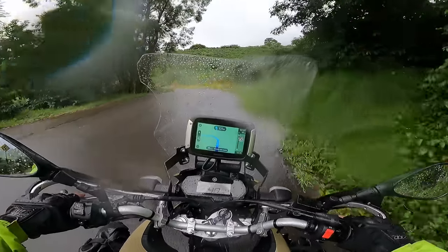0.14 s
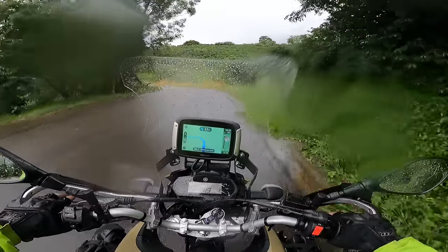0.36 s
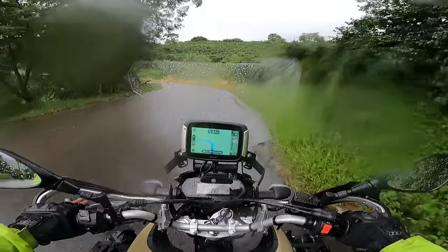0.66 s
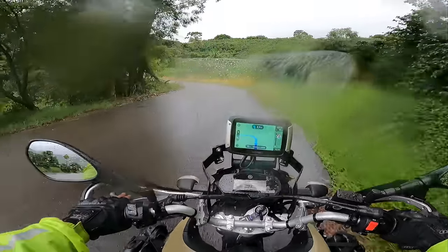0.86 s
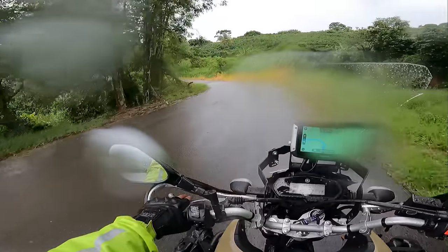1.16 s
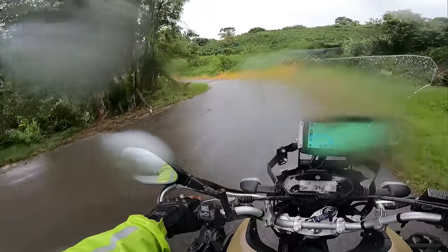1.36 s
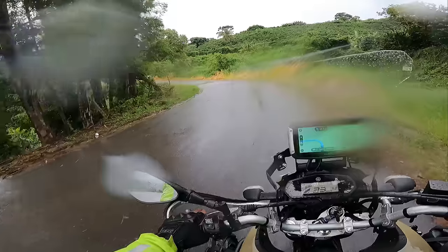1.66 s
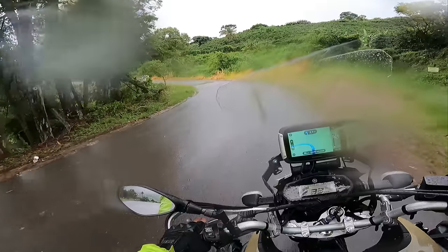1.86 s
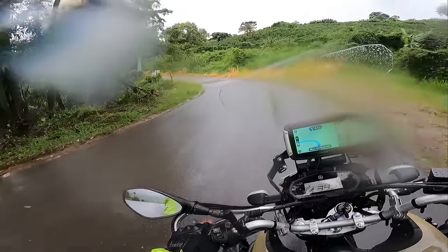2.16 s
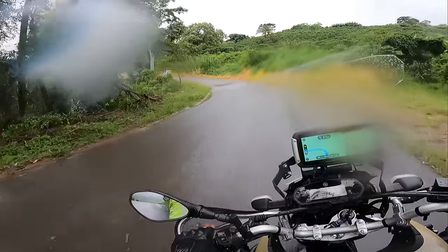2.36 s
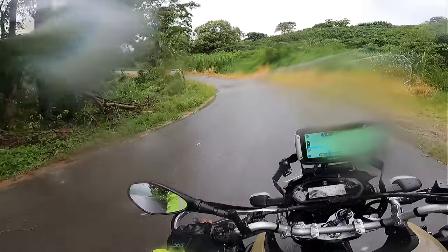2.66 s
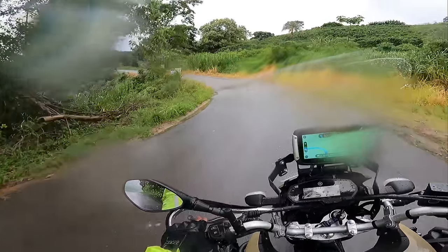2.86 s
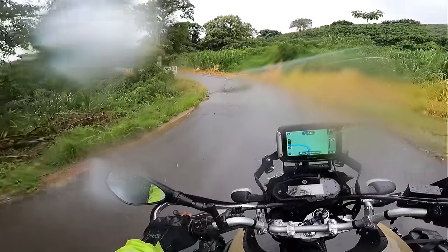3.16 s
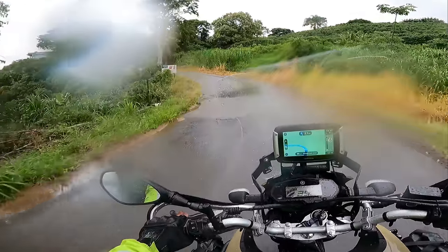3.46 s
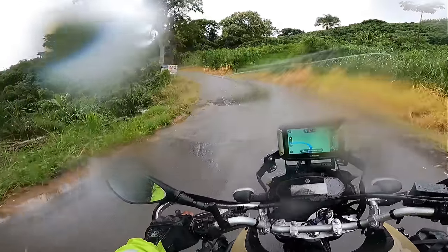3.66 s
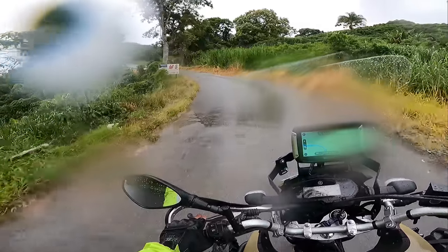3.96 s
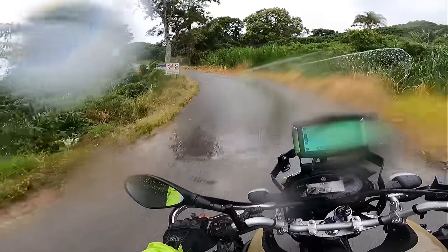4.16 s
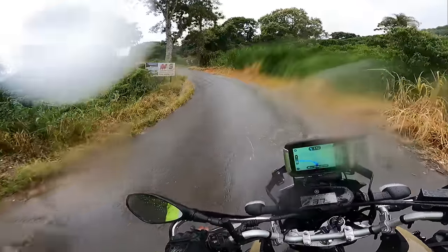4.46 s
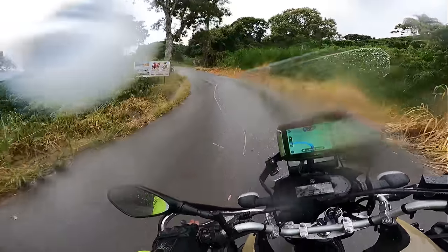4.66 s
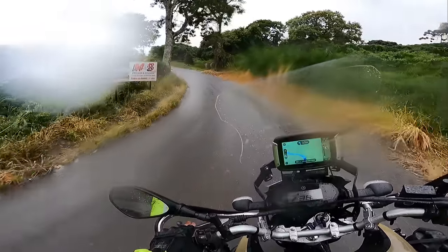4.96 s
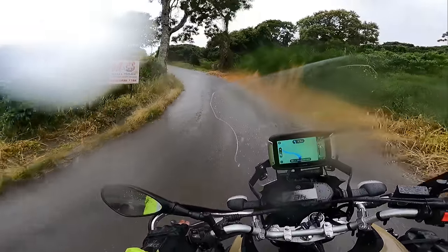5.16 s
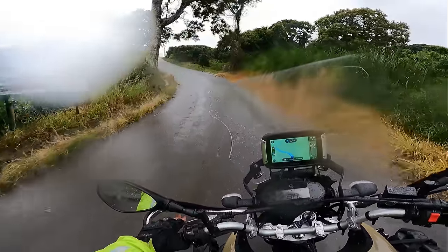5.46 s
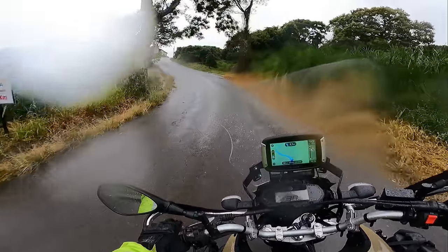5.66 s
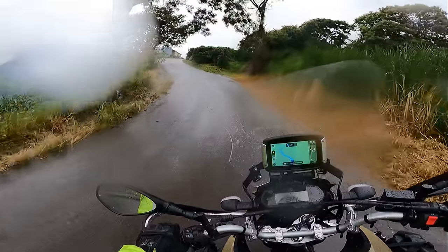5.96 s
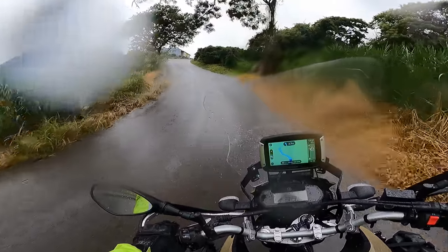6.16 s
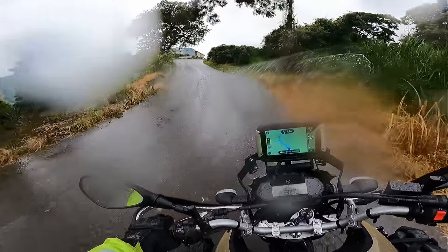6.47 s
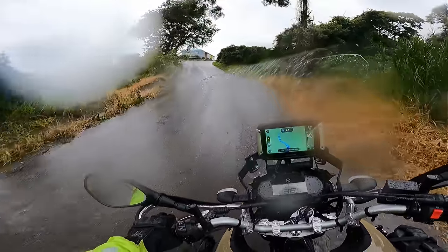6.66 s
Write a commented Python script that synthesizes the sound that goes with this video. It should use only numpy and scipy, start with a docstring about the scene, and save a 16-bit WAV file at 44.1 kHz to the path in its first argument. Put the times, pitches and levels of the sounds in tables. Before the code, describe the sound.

A single-cylinder motorcycle cruises on a wet country road, heard close from the rider's position. Its rapid exhaust pulses blur into a throaty drone, easing slightly, then slowly climbing. Deep wind thumps and buffets the microphone throughout, over fine tyre spray hiss and light metallic engine clatter. Sharp water drops tick on the housing mid-ride, and near six seconds the throttle opens, quicker and louder.

```python
"""Exhaust beats come first, close under the rider's helmet: a single-cylinder motorcycle on a wet road.
Clicks at the firing rate ring the pipe, tail and chamber; taps, knock and noise ring the metal parts.
Tones on the firing rate make drones and gear whine. Shaped noise makes the airstream, which thumps the
microphone, the tyre spray, the drops ticking on its housing and the brief whirrs.
In the last second the throttle opens: the firings quicken and the exhaust grows louder."""
import sys
import numpy as np
from scipy import signal
from scipy.fft import rfft, irfft
from scipy.io import wavfile
from scipy.ndimage import uniform_filter1d

SR = 44100
rng = np.random.default_rng(int(sys.argv[2]) if len(sys.argv) > 2 else 0)


def store_wav(level_fs):
    """Save 16-bit WAV to argv[1]."""
    pcm = np.round(np.clip(np.atleast_2d(level_fs), -1, 1) * 32767)
    wavfile.write(sys.argv[1], SR, pcm.T.astype(np.int16))


def convert_level_to_amplitude(level_db):
    """Map a level in decibels to its linear amplitude factor."""
    exponent = np.asarray(level_db, float) / 20
    return 10 ** exponent


N = 300446
T = np.arange(N) / SR  # seconds

# Crank speed along the road. Each row: time in seconds, firings per second.
CRANK_SPEED = [(0.0, 31.24), (0.3, 29.29), (0.87, 27.13), (1.55, 25.85), (2.4, 27.06), (3.34, 27.83),
               (4.19, 29.17), (4.48, 28.79), (4.65, 30.12), (4.85, 29.57), (5.3, 29.76), (5.92, 29.5),
               (6.06, 37.01), (6.2, 34.77), (6.35, 38.9), (6.43, 39.3), (6.5, 37.22), (6.81, 36.35)]


def evened(x):
    """Scales to unit power."""
    return x / np.sqrt(np.mean(x ** 2) + 1e-20)


def curves(rows):
    """Every column of a table after its times, drawn as straight lines over all samples."""
    s, *columns = np.transpose(rows)
    return [np.interp(T, s, c) for c in columns]


def wander(smooth_s):
    """Slow random drift of unit power: noise averaged twice over smooth_s seconds."""
    size = int(smooth_s * SR)
    once = uniform_filter1d(rng.standard_normal(N), size)
    return evened(uniform_filter1d(once, size))


def coloured(points):
    """Noise of unit power with the given spectrum, drawn straight over log frequency."""
    f, db = np.transpose(points)
    hz = np.fft.rfftfreq(N, 1 / SR)
    gain = convert_level_to_amplitude(np.interp(np.log(hz + 0.2), np.log(f), db))
    return evened(irfft(rfft(rng.standard_normal(N)) * gain, N))


def ring(x, modes):
    """Passes x through a set of resonances of alternating sign, then scales to unit power."""
    out = np.zeros(N)
    for k, (hz, width, db) in enumerate(modes):
        pole = np.exp((2j * np.pi * hz - np.pi * width) / SR)
        rung = signal.lfilter([1 - abs(pole)], [1, -pole], x).imag
        out += (-1) ** k * convert_level_to_amplitude(db) * rung
    return evened(out)


def beats(turns, spread_db):
    """One click at each whole turn, of varying strength."""
    size = convert_level_to_amplitude(spread_db * rng.standard_normal(2000))
    whole = np.floor(turns).astype(int)
    return np.diff(whole, prepend=whole[0]) * size[whole % 2000]


def bump(s, half_s):
    """A smooth rise and fall about s, down to 1/e at half_s either side."""
    return np.exp(-np.minimum(((T - s) / half_s) ** 2, 50))


def crank():
    """Cycles completed, a little uneven: combustion never starts at quite the same angle."""
    turns = 1 + np.cumsum(curves(CRANK_SPEED)[0]) / SR
    return turns + .006 * wander(.03)


def stand_out(column):
    """Gain on firings harder or softer than their neighbours; the blast comes just before it is heard in full."""
    # Each row: time in seconds, bark gain in dB, knock gain in dB.
    uneven_firings = [(.037, 5, 0), (.234, 4, 0), (.373, 4, 0), (.477, 7, 0), (.705, 5, 0), (2.12, 5, 0),
                      (2.159, 6, 0), (2.492, 2, 0), (2.602, 6, 0), (2.639, 2, 0), (2.748, 6, 0),
                      (2.858, 4, 0), (3.112, 6, 0), (3.147, 4, 0), (3.684, 8, 0), (3.824, 3, 0),
                      (3.86, 4, 0), (4.174, 5, 0), (4.309, 4, 0), (4.415, 4, 0), (4.549, 4, 0),
                      (4.684, 6, 0), (4.751, 5, 0), (4.784, 5, 0), (4.852, 4, 0), (4.954, 6, 0),
                      (5.021, 4, 0), (5.357, 6, 0), (5.561, 6, 0), (5.762, 5, 0), (6.081, 4, -4),
                      (6.108, -5, -6), (6.135, 5, -6), (6.162, -3, -5), (6.192, 6, -5), (6.22, -5, 7),
                      (6.25, -2, -5), (6.276, 0, 4), (6.304, 4, -7), (6.331, 6, 5), (6.381, -4, -7),
                      (6.431, -5, -4), (6.456, 5, 2), (6.538, 3, 1), (6.592, 0, 2), (6.619, 0, 3),
                      (6.645, 2, 2), (6.672, -3, 0), (6.701, 4, 5), (6.727, 2, 4), (6.755, 0, 2),
                      (6.783, -2, -3)]
    return convert_level_to_amplitude(sum(row[column] * bump(row[0] - .004, .011) for row in uneven_firings))


def silencer(turns):
    """A crisp firing of varying strength; the chambers even it out into a dull, steady string of echoes."""
    # Reflections between the chambers. Each row: delay in ms, gain before the low-pass.
    reflections = [(4.3, -0.095), (9.1, 0.61), (12.7, 0.54), (17.9, -0.35), (22.2, 0.26), (26.5, -0.57),
                   (31, -0.07)]
    crisp = evened(stand_out(column=1) * beats(turns, spread_db=1.3))
    steady = evened(beats(turns, spread_db=1))
    echoes = sum(gain * np.roll(steady, int(ms * SR / 1000)) for ms, gain in reflections)
    dull = signal.lfilter(*signal.butter(4, 600, fs=SR), echoes)
    return crisp, .5 * steady + .9 * dull


def exhaust(turns, firing, echoed, over_cruise_db):
    """Firing pulses and gas rush ring the pipe; the tail barks and the first chamber thumps."""
    # Exhaust pipe and silencer. Each row: centre in Hz, width in Hz, relative gain in dB.
    pipe_modes = [(188, 49, -3), (269, 33, -3), (350, 32, -4), (489, 86, -0.5), (523, 90, 0.5),
                  (708, 132, 1.5), (825, 82, 1.5), (813.3, 21, 7.5), (871, 30, 1)]
    # Short tail pipe that barks at each firing. Each row: centre in Hz, width in Hz, relative gain in dB.
    tail_modes = [(830, 185, 0)]
    # First chamber, thumped just after each firing. Each row: centre in Hz, width in Hz, relative gain in dB.
    chamber_modes = [(480, 105, 0)]
    # Balance against the pipe. Each row: time in seconds, bark gain in dB, thump gain in dB, ahead of the mix.
    punch_rows = [(0, -3.5, -4), (.7, 1.5, -3.5), (.95, -1, -2.5), (1.4, -1.5, -3), (2, -0.5, -1),
                  (2.15, 0.5, 1), (3.1, -1.5, -0.5), (3.8, -1.5, -2), (4, -2.5, -3.5), (4.7, 0, -1),
                  (5.7, 0, -0.5), (6.1, -0.5, -4.5), (6.81, 0.5, -6.5)]
    bark_gain, thump_gain = convert_level_to_amplitude(np.array(curves(punch_rows)))
    rush = (.5 + np.exp(-(turns % 1) / 0.8)) * rng.standard_normal(N)
    pipe = ring(.8 * echoed + .5 * evened(rush), pipe_modes)
    # the bark gains half a dB over the rest of the exhaust per dB of load
    blast = np.roll(firing * convert_level_to_amplitude(.5 * over_cruise_db), 60)
    bark = ring(ring(blast, tail_modes), tail_modes)  # rung twice, it starts softly
    late_beats = np.roll(beats(turns, spread_db=1.5), 270)  # 6 ms after the firing
    thump = ring(ring(late_beats, chamber_modes), [(480, 220, 0)])
    return .72 * pipe + .62 * bark_gain * bark + .58 * thump_gain * thump


def valve_cover(turns, valve_db, knock_db):
    """Valve taps, steady valve-gear noise and combustion knock ring the cover."""
    # Valve cover. Each row: centre in Hz, width in Hz, relative gain in dB.
    cover_modes = [(3415, 370, 19), (3610, 495, 21)]
    # What the knock rings after the cover. Each row: centre in Hz, width in Hz, relative gain in dB.
    knock_modes = [(3660, 440, 0), (2100, 500, -12)]
    # Valves seating. Each row: share of the cycle after firing, relative level in dB.
    seatings = [(.49, 0), (.7, -5), (.93, 0)]
    taps = evened(sum(convert_level_to_amplitude(db) * beats(turns - share, spread_db=3) for share, db in seatings))
    gear = convert_level_to_amplitude(valve_db) * (.45 * taps + rng.standard_normal(N))
    knock = convert_level_to_amplitude(knock_db) * evened(stand_out(column=2) * beats(turns - .04, spread_db=.8))
    gear_ring = ring(ring(gear, cover_modes), [(3350, 2800, 0)])
    knock_ring = ring(ring(knock, cover_modes + knock_modes[1:] * 2), knock_modes)
    # ringing gives unit power, so each takes back the level that drove it
    return gear_ring * np.sqrt(np.mean(gear ** 2)) + knock_ring * np.sqrt(np.mean(knock ** 2))


def clatter(turns, firing):
    """Noise that surges with every cycle, and the firing itself, ring the engine cases."""
    # Engine cases and frame. Each row: centre in Hz, width in Hz, relative gain in dB.
    case_modes = [(880, 1200, 3.5), (1332, 83, 9), (1752, 110, -5), (2124, 63, 4.5), (2640, 450, -12.5),
                  (4230, 20, -6.5), (6840, 33, -5), (9230, 110, -14)]
    shake = (.9 + np.exp(-((turns + .02) % 1) / .2)) * convert_level_to_amplitude(1.5 * wander(.01))
    return ring(evened(shake * rng.standard_normal(N)) + .2 * firing, case_modes)


def drones(turns):
    """Pure tones on multiples of the firing rate, at a resting level save where the frame sings along or fades."""
    # Held tones. Each row: multiple of the firing rate, start in seconds, end in seconds, mean level in dB.
    held_tones = [(3, .12, .63, -31), (11, .75, 3.3, -44), (12, 1, 3.9, -43.5), (5, .9, 1.65, -40),
                  (10, 1.8, 3.4, -38.5), (10, 3.4, 4.6, -36.5), (10, 4.7, 5.75, -39.5), (5, 2.7, 4.3, -41),
                  (2, 5.95, 6.9, -35), (4, 6.02, 6.9, -33), (4, 6.28, 6.47, -36), (5, 5.85, 6.9, -56),
                  (8, 6.05, 6.9, -38), (13, 6.5, 6.9, -38), (12, 6.25, 6.9, -42), (22, 6.3, 6.9, -35.5)]
    # Tones outside those holds. Each row: multiple of the firing rate, mean level in dB.
    resting_tones = [(2, -50), (3, -47), (4, -47), (5, -44), (8, -56), (10, -45), (11, -56), (12, -56),
                     (13, -56), (22, -56)]
    fade_s = .1
    out = np.zeros(N)
    for k, rest_db in resting_tones:
        level = convert_level_to_amplitude(rest_db)
        for multiple, start, end, db in held_tones:
            if multiple == k:
                hold = np.clip(np.minimum(T - start, end - T) / fade_s + .5, 0, 1)
                level = level + (convert_level_to_amplitude(db) - convert_level_to_amplitude(rest_db)) * hold
        tone = np.sqrt(2) * np.sin(2 * np.pi * (k * turns + rng.random()))
        out += level * convert_level_to_amplitude(1.7 * wander(.05)) * tone
    return out


def engine(turns):
    """Load and revs set the levels of exhaust, valve cover and clattering cases; drones join them."""
    # Engine load, as level of the exhaust. Each row: time in seconds, level in dB.
    load_rows = [(0, -31), (.8, -32.5), (1.05, -33), (1.9, -32), (2.3, -30.5), (3.2, -29.5), (3.5, -30),
                 (3.8, -30), (4.5, -31), (4.8, -30), (5.2, -33.5), (5.45, -31.5), (5.85, -33), (6.1, -28),
                 (6.25, -29.5), (6.47, -26), (6.6, -28), (6.81, -26.5)]
    exhaust_db = curves(load_rows)[0]
    over_cruise_db = exhaust_db + 31.5  # above the load at which the base levels hold
    revs_hz = curves(CRANK_SPEED)[0] - 28.5  # above the cruising firing rate
    metal_db = over_cruise_db + 0.26 * revs_hz  # load and faster revs make the metal parts louder
    knock_db = -66 + 2.5 * over_cruise_db + 1.4 * revs_hz  # grows steeply with load and revs
    firing, echoed = silencer(turns)
    out = convert_level_to_amplitude(exhaust_db) * exhaust(turns, firing, echoed, over_cruise_db)
    out += valve_cover(turns, -52.5 + metal_db, knock_db)
    out += convert_level_to_amplitude(-40 + metal_db) * clatter(turns, firing)
    return out + drones(turns)


def whine(turns):
    """A fuzzy gear tone that rides on the crank speed: teeth mesh 49 times a cycle."""
    # Gear whine. Each row: time in seconds, level in dB.
    whine_rows = [(0, -51), (.7, -76), (.85, -48), (1.7, -46.5), (2.3, -53), (3.3, -46), (4.6, -50),
                  (5.1, -53), (6.81, -50)]
    order, width_hz = 49, 70
    pole = np.exp(-np.pi * width_hz / SR)
    fuzz = signal.lfilter([1], [1, -pole], rng.standard_normal(N) + 1j * rng.standard_normal(N))
    tone = (fuzz * np.exp(2j * np.pi * order * turns)).real
    return convert_level_to_amplitude(curves(whine_rows)[0]) * evened(tone)


def wind():
    """Deep rumble, lumpy buffeting, and single dips or pushes of pressure with a rebound either side."""
    # Airstream at the microphone, before it flattens.
    # Each row: time in seconds, rumble level in dB, buffeting level in dB.
    air_rows = [(0, -13.5, -21), (.5, -18, -24), (1.2, -17.5, -23), (1.75, -20, -21.5), (2.05, -17, -22.5),
                (2.5, -14.5, -18), (3.1, -12, -28), (3.7, -15.5, -21), (4.25, -27, -23), (4.5, -6.5, -17.5),
                (4.78, -22.5, -24.5), (5.25, -18.5, -25.5), (5.85, -24, -24.5), (6.2, -13, -20.5),
                (6.6, -27, -28), (6.81, -15, -19)]
    # Gusts on top of it. Each row: time in seconds, rumble in dB, buffeting in dB, half length in seconds.
    gust_rows = [(0.092, -30, -24, 0.029), (0.566, -30, -24, 0.013), (0.663, -7, -37, 0.026),
                 (0.788, -48, -15.5, 0.017), (0.968, -14, -26, 0.048), (1.413, -8.5, -33, 0.0082),
                 (1.595, -8.5, -38, 0.025), (1.72, -27, -18.5, 0.046), (1.82, -32, -20, 0.035),
                 (1.919, -17, -15.5, 0.016), (2.162, -15, -46, 0.1), (2.34, -10.5, -20.5, 0.098),
                 (2.73, -5.5, -48, 0.026), (2.8, -32, -51, .02), (2.91, -32, -17.5, 0.034),
                 (3.05, -14, -22, 0.056), (3.356, -10, -14, 0.027), (3.866, -26, -34, 0.016),
                 (4.02, -6.5, -41, 0.052), (4.484, -13, -31, 0.036), (4.93, -0.5, -21.5, 0.067),
                 (5.11, -25, -27, 0.033), (5.513, -12.5, -42, 0.096), (5.736, -34, -18, 0.043),
                 (5.992, -8, -20, 0.018), (6.122, -11, -26, 0.015), (6.413, -13, -32, 0.056)]
    # Colour of the rumble. Each row: frequency in Hz, relative level in dB per Hz.
    rumble_colour = [(3, -42), (7, 5), (11, 8.5), (22, -8.5), (30, -11.5), (70, -26.5), (91, -35),
                     (150, -120)]
    # Colour of the buffeting. Each row: frequency in Hz, relative level in dB per Hz.
    buffet_colour = [(30, 6), (55, 2), (100, -8.5), (200, -15), (300, -16), (900, -57)]
    # Sudden eddies that suck at the microphone. Each row: time in seconds, depth in dB, half width in ms.
    sucking_eddies = [(1.795, -14, 2), (1.838, -12, 1.3), (1.903, -14, 1.3), (1.928, -11, 1.5),
                      (3.372, -14, 2.5), (4.8615, -14, 1.2), (5.0677, -5, .58), (5.074, -10, 1.6),
                      (5.115, -16, 2.6), (5.137, -14, 2), (5.905, -19, 1.1), (5.912, -14, 2.5),
                      (6.4755, -7, .75), (6.4815, -14, 1.8), (.055, -8, 11), (1.719, -6.5, 11),
                      (1.872, -5.5, 11), (2.177, -6.5, 10), (2.345, -8, 5), (2.915, -7.5, 7),
                      (3.66, -5.5, 11), (3.954, -7, 12), (4.5, -7, 6), (4.535, -6, 12), (4.632, -6.5, 10),
                      (5.003, -5, 11), (5.434, -7.5, 13), (5.586, -5.5, 14), (5.941, -7, 14),
                      (6.368, -7, 11)]
    # Eddies that push instead. Each row: time in seconds, height in dB, half width in ms.
    pushing_eddies = [(2.611, -8, 13), (3.002, -7.5, 12), (5.731, -7, 8), (6.12, -9, 6), (6.481, -4.5, 8)]
    rumble, buffet = convert_level_to_amplitude(np.array(curves(air_rows))) ** 2  # powers, so gusts add
    for s, rumble_db, buffet_db, half_s in gust_rows:
        gust = bump(s, half_s)
        rumble = rumble + convert_level_to_amplitude(2 * rumble_db) * gust
        buffet = buffet + convert_level_to_amplitude(2 * buffet_db) * gust
    # the diaphragm stiffens in big gusts
    out = .62 * np.tanh(np.sqrt(rumble) * coloured(rumble_colour) / .62)
    out += np.sqrt(buffet) * evened(coloured(buffet_colour) * convert_level_to_amplitude(3.04 * wander(0.013)))
    for sign, eddies in ((-1, sucking_eddies), (1, pushing_eddies)):
        for s, db, width_ms in eddies:
            u = ((T - s) * 1000 / width_ms) ** 2
            out += sign * convert_level_to_amplitude(db) * (1 - .85 * u) * np.exp(-np.minimum(u, 99) / 2)
    return out


def flattened(x):
    """Rounds off the biggest swings of the airstream's pressure."""
    limit, order = .76, 6  # ceiling, sharpness of the knee
    return x / (1 + abs(x / limit) ** order) ** (1 / order)


def spray(turns):
    """Flickering tyre and air hiss with tiny droplets; intake air adds a puff half a cycle after firing."""
    # Tyre spray and air hiss. Each row: time in seconds, level in dB.
    spray_rows = [(0.0, -40.5), (1.54, -42.5), (2.48, -38.5), (2.92, -40), (4.04, -40), (4.53, -38.5),
                  (4.97, -39.5), (5.05, -44), (5.24, -45.5), (5.6, -41.5), (5.75, -43.5), (5.92, -46),
                  (5.98, -40.5), (6.15, -40.5), (6.54, -35.5), (6.81, -37)]
    # Colour of the hiss. Each row: frequency in Hz, relative level in dB per Hz.
    hiss_colour = [(1500, 13), (2500, 3), (4400, 0), (6500, 3), (8900, 1), (11000, -5), (13000, -9),
                   (15700, -32)]
    puff = 1 + 0.87 * np.exp(-((turns - .54) % 1) / 0.8)
    flicker = convert_level_to_amplitude(0.85 * wander(0.036) + 0.53 * wander(0.017))
    hiss = coloured(hiss_colour) * flicker * puff
    # about 60 droplets a second
    specks = (rng.random(N) < 60 / SR) * convert_level_to_amplitude(4 * np.minimum(rng.exponential(1, N), 2.2))
    splash = signal.lfilter([1], [1, -.985], specks)
    return convert_level_to_amplitude(curves(spray_rows)[0]) * evened(hiss * (1 + 0.57 * splash))


def drops():
    """Each drop on the housing is a sharp burst of noise about its own centre, narrow or wide."""
    # Drops striking the housing. Each row: start in seconds, level before the decay in dB, centre in Hz,
    # time to decay by 60 dB in seconds, steepness of the fall about the centre in dB (below 0 it rises).
    strikes = [(0.6153, -41, 9000, 0.022, 10), (2.477, -31, 5000, 0.016, 10), (2.63, -36, 9000, 0.022, 4),
               (3.918, -32, 4560, 0.018, 11), (4.152, -35, 5000, .025, -2), (4.2423, -20.5, 2490, 0.024, 7),
               (4.287, -28, 2930, 0.017, 8), (4.389, -29, 9000, 0.016, -1), (4.4233, -26, 3100, 0.027, 6),
               (4.534, -30, 7000, .025, -2), (4.6044, -21, 6000, 0.019, 0), (4.694, -26, 7100, 0.02, 9),
               (6.0635, -34, 8500, 0.02, 10), (6.6948, -28, 5000, 0.02, 3)]
    size = 4096
    out, t, hz = np.zeros(N), np.arange(size) / SR, np.fft.rfftfreq(size, 1 / SR) + 1
    for s, db, centre_hz, t60, fall_db in strikes:
        octaves = np.log2(hz / centre_hz)
        tilt_db = -fall_db * octaves ** 2 / (1 + 0.42 * abs(octaves))
        spectrum = rfft(rng.standard_normal(size)) * convert_level_to_amplitude(tilt_db - 6 * (hz / 11000) ** 2)
        burst = evened(irfft(spectrum)) * convert_level_to_amplitude(-60 * t / t60)
        burst *= np.minimum(t / .0003, 1)  # soft onset
        part = out[int(s * SR):][:size]
        part += convert_level_to_amplitude(db) * burst[:len(part)]
    return out


def whirrs():
    """Each brief whirr is noise through a resonance, then one twice as wide, under a smooth swell."""
    # Each row: middle in seconds, centre in Hz, width of the first resonance in Hz, level at the top in dB,
    # half length in seconds.
    swell_rows = [(0.744, 1640, 120, -41, 0.026), (1.9, 1770, 250, -46, 0.14),
                  (2.377, 1700, 250, -40, 0.16), (2.45, 4430, 500, -52.5, 0.31),
                  (3.45, 1720, 350, -41.5, 0.21), (4.497, 1880, 300, -44.5, 0.26), (6, 654, 40, -36, 0.13),
                  (6.25, 1690, 200, -49, .06), (6.434, 2000, 600, -38, 0.037)]
    noise = rng.standard_normal(N)
    out = np.zeros(N)
    for s, hz, width, db, half_s in swell_rows:
        band = ring(ring(noise, [(hz, width, 0)]), [(hz, 2 * width, 0)])
        out += convert_level_to_amplitude(db) * bump(s, half_s) * band
    return out


def scene():
    """All sources at one microphone."""
    turns = crank()
    out = engine(turns) + whine(turns) + flattened(wind())
    out += spray(turns) + drops() + whirrs()
    return out[None]


def band_limit(x):
    """A steep low-pass at the top of the band."""
    return signal.sosfilt(signal.butter(12, 15750, fs=SR, output="sos"), x)


def record(dry):
    """The microphone adds its own faint hiss, rising towards the treble."""
    hiss = evened(np.diff(rng.standard_normal(N + 1)))
    mix = dry + convert_level_to_amplitude(-58) * hiss
    return band_limit(mix)


dry = scene()
out = record(dry)
store_wav(out)
```